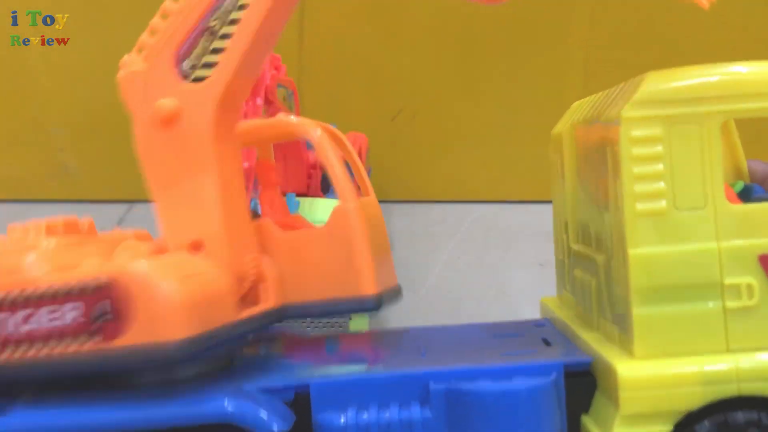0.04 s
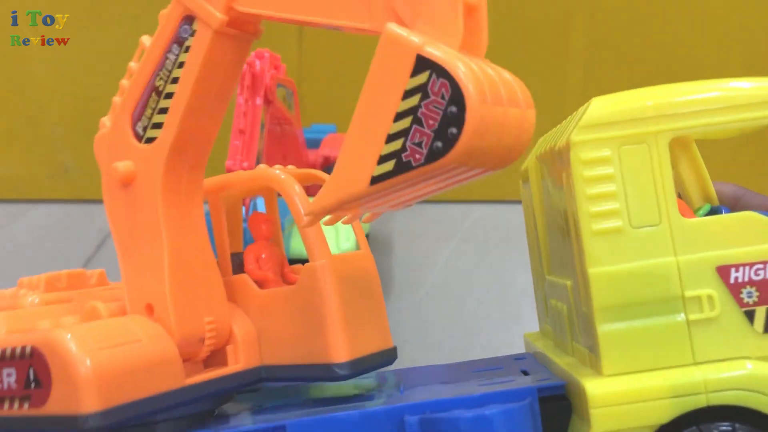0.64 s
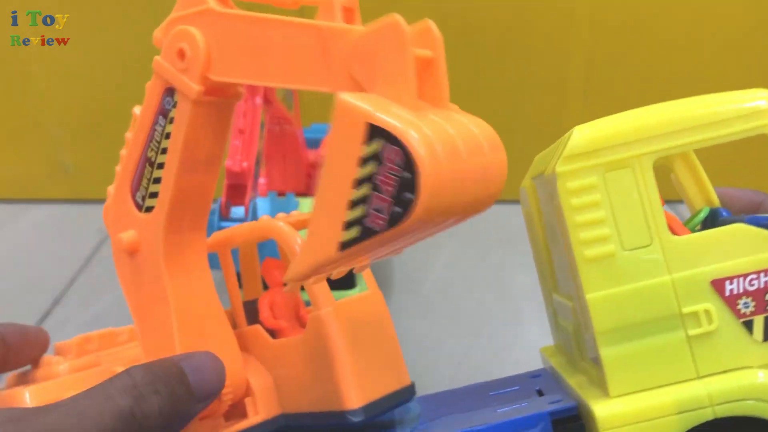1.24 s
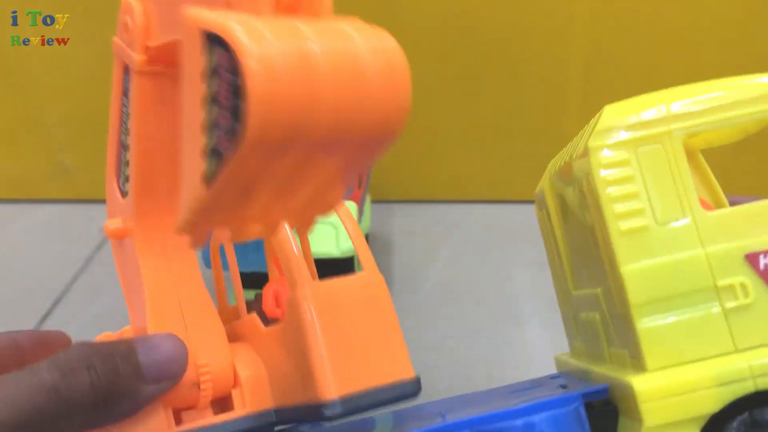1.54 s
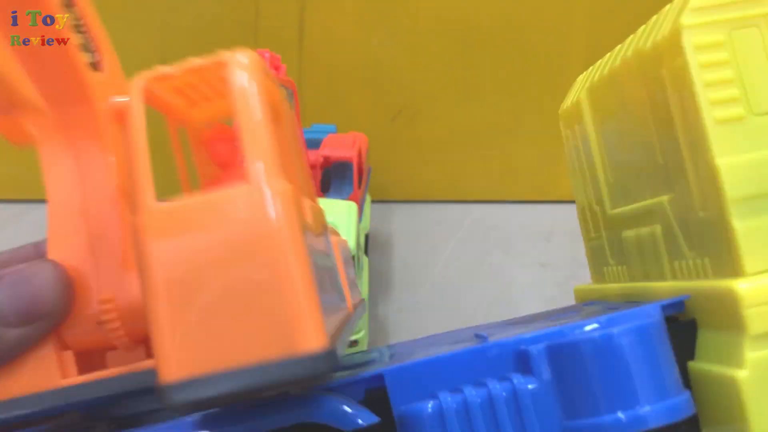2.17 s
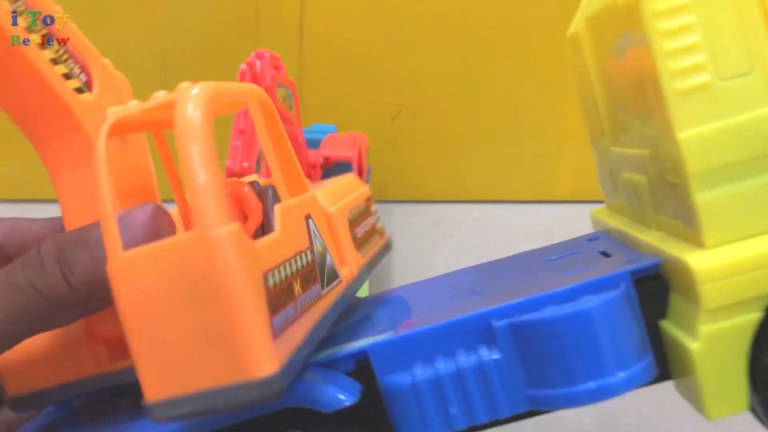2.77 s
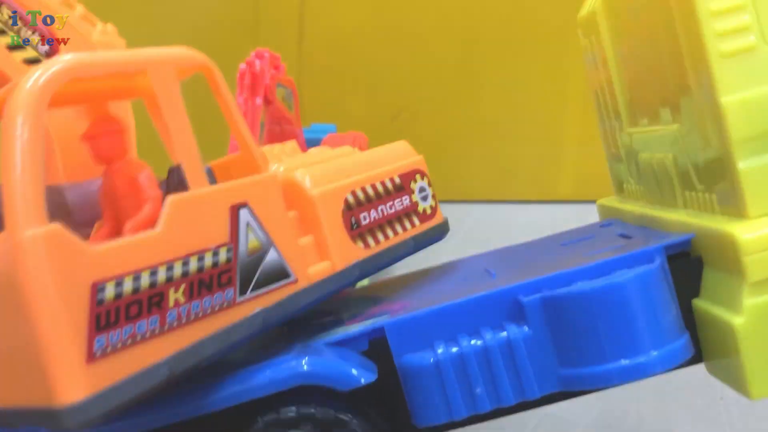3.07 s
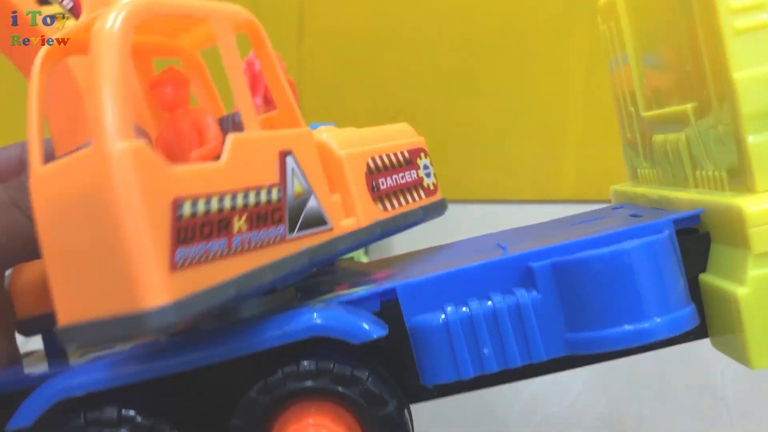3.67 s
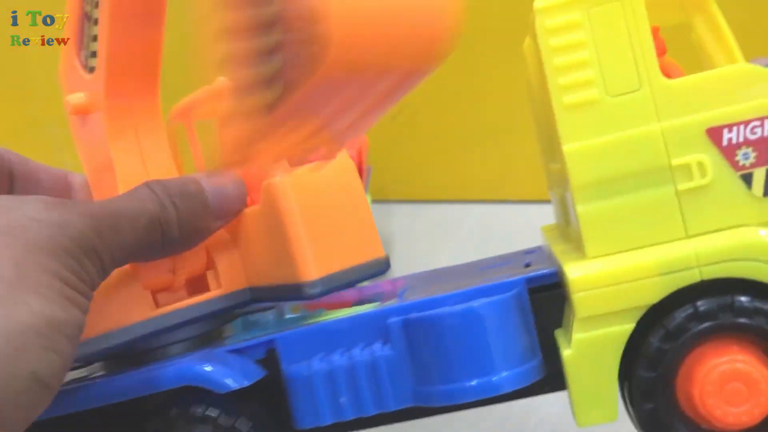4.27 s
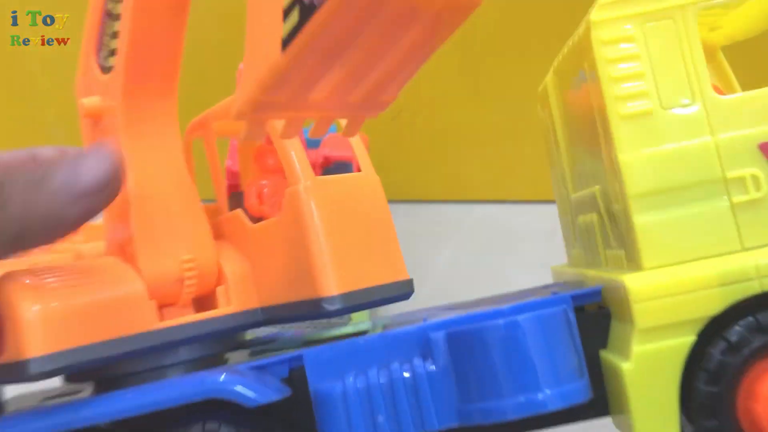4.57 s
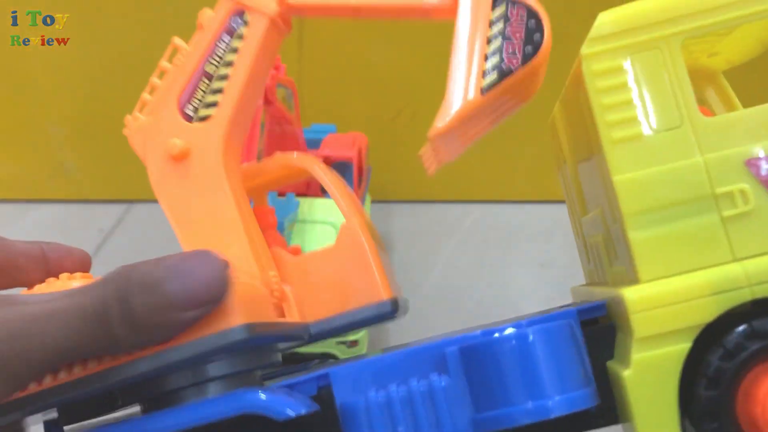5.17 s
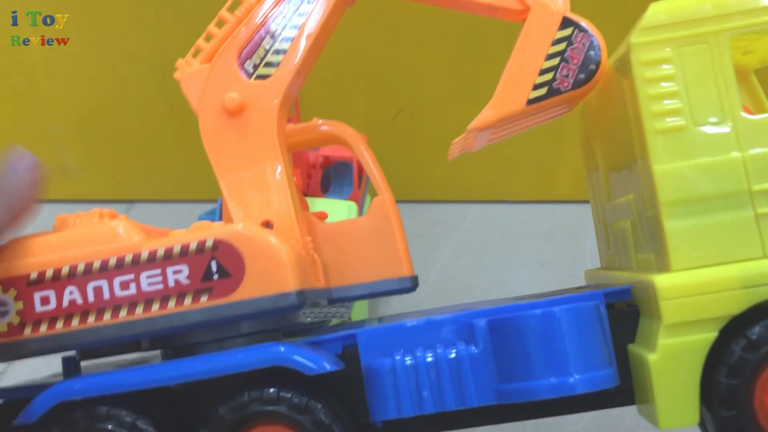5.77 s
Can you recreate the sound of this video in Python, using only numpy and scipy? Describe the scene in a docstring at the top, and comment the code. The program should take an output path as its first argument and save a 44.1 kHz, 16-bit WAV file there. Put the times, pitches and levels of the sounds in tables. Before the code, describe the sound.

A hollow plastic toy's stiff joint clicks and snaps in short ratcheting bursts, with light bumps and ticks over faint room hum.

```python
"""Over faint room hum, a stiff plastic joint clicks and snaps: a hollow toy excavator is being turned by
hand on a toy truck's trailer, close to a phone in a hard room. Each ratchet step slips in a run of
clicks, then catches with a snap that rings the shell. The base bumps softly on the trailer, and loose
parts tick under the fingers. The room answers each burst; the phone's limiter flattens the loudest snaps.
"""
import sys
import numpy as np
from scipy import signal
from scipy.fft import rfft, irfft
from scipy.io import wavfile
from scipy.ndimage import uniform_filter1d, minimum_filter1d

SR = 44100
rng = np.random.default_rng(int(sys.argv[2]) if len(sys.argv) > 2 else 0)


def dump(signal):
    """Clip the signal to [-1, 1] and save it as 16-bit WAV at the path in sys.argv[1]."""
    limited = np.clip(np.atleast_2d(signal).T, -1, 1)
    pcm = np.round(limited * 32767).astype(np.int16)
    wavfile.write(sys.argv[1], SR, pcm)


N = 265041

# spectrum of the room's air and rumble: f/Hz, relative level/dB
AIR_SPECTRUM = [(15, -48), (25, -46), (48, -9.5), (70, -1), (92, 1.5), (236, -15.5), (293, -10), (384, -21),
                (641, -16), (911, -22.5), (1370, -23), (1840, -24.5), (2910, -30), (4030, -31.5),
                (10400, -38), (16000, -41.5)]
# swells of the low hum: t/s, level/dB
HUM_SWELLS = [(0, -56), (1.7, -54.5), (1.949, -41), (2.25, -51), (4.2, -54), (4.498, -43.5), (5.3, -42),
              (5.55, -52.5), (6, -46.5)]
# Bass and treble below are set against the mids.
# click runs of a slipping joint: t/s, length/s, clicks, first level/dB, swell over the run/dB,
# first treble/dB, last treble/dB, joint ring f/Hz
SLIP_RUNS = [(0.0824, 0.0032, 2, -5, -10, 3, 10.5, 4400), (0.3418, 0.0021, 2, -24, -1.5, -16, -1, 4420),
             (1.434, 0.0089, 5, -20.5, 2, 2.5, 9.5, 4500), (1.6899, 0.0063, 3, -21.5, 4.5, -15, 8, 4700),
             (1.9171, 0.0047, 2, -15.5, 7, 3.5, 3.5, 4730), (2.1329, 0.0044, 3, -15.5, 2.5, -3, 3.5, 3630),
             (2.8622, 0.012, 7, -4.5, -10.5, 2, 6, 2215), (3.0394, 0.014, 8, -6.5, -11, 0.5, 6, 2100),
             (3.9288, .003, 2, 6, -10.5, 4.5, 3, 2130), (4.0379, 0.0035, 2, 7.5, -11.5, 2, 5, 2540),
             (4.1235, .0041, 2, 5, -5.5, 0.5, 3, 2460), (4.1764, 0.0055, 2, -2, -17, -20, 24, 1260),
             (4.2798, 0.0044, 2, -1, -17, -5, 4, 1750), (4.9833, 0.0027, 2, 3, -21, -9, 18, 4480),
             (5.0868, 0.0075, 2, 1, -24, -4.5, 15, 2230), (5.2262, 0.0062, 2, 5.5, -19.5, -2, 1, 4040)]
# the ratchet catching its next tooth: t/s, level/dB, bass/dB, treble/dB, joint ring f/Hz
TOOTH_CATCHES = [(0.0972, 1, 11, 6, 3900), (0.3771, -1.5, 10, -6.5, 4250), (1.4698, -2.5, 9, -3.5, 4250),
                 (1.7227, -2.5, 10, 6, 4060), (1.9413, -3.5, 14.5, 10.5, 4880),
                 (2.1531, -0.5, 14, -0.5, 1210), (2.875, -8, 22.5, 8, 4300),
                 (3.0552, -1.5, 16.5, 4.5, 2100), (3.9351, -2, 19.5, 11, 8500),
                 (4.044, -2.5, 14, 13.5, 8400), (4.1314, 2.5, 12, 9, 8170), (4.1848, -2, 10.5, 2, 2570),
                 (4.2904, -6.5, -10, 16, 8200), (4.2933, 2, 6.5, -4.5, 7600), (4.9926, -7.5, 21, 6, 4270),
                 (5.0997, -2, 15.5, 11.5, 4400), (5.2368, -8, 22, 19, 8100)]
# modes of the excavator's shell: f/Hz, level/dB, t60/s
SHELL_MODES = [(340, -35, 0.011), (613, -27.5, 0.024), (930, -67, 0.0072), (1177, -4.5, 0.024),
               (1419, 0, 0.015), (1694, -2.5, 0.014), (2247, -14, 0.018), (2710, -11, 0.014),
               (3206, -13.5, 0.021), (3810, -29, 0.024), (3930, -14.5, 0.012), (4500, -9.5, 0.0058),
               (5500, -24, 0.0076), (6900, -20, 0.016), (7690, -12, 0.011), (8640, -12, 0.011),
               (10230, -14, 0.0059)]
# crack of a hit, from dense, quickly damped modes of the plastic: f/Hz, relative level/dB
CRACK_SPECTRUM = [(200, -17), (700, -32), (1500, -23), (4400, 17.5), (6000, -0.5), (8200, 9.5), (11000, 5),
                  (15500, -4)]
# colour of the reverb: f/Hz, relative level/dB
REVERB_SPECTRUM = [(150, -8.5), (240, -8), (300, 2.5), (370, -4.5), (620, 4), (850, 8.5), (1230, 14.5),
                   (1550, 9), (2000, 4), (3000, 2.5), (4200, 1), (5800, -6.5), (8200, -2), (11500, -11),
                   (16000, -22)]
# decay of the reverb: f/Hz, t60/s
REVERB_DECAY = [(280, 0.23), (450, 0.3), (900, 0.32), (1200, 0.39), (2400, .37), (4200, 0.42), (6000, 0.41),
                (8400, 0.38), (15000, 0.36)]
# light bumps of toy on toy: t/s, level/dB, bass/dB, treble/dB, touched part's ring f/Hz
TOY_BUMPS = [(0.1998, -23, 8, 1, 1460), (0.3425, -29.5, 22, -8, 690), (0.6653, -41, 10, -11, 1060),
             (0.8445, -35, 9, -12, 2900), (1.0723, -43, -5, -8, 3520), (2.399, -41, 15, 6, 5170),
             (2.6407, -34.5, 23.5, -5, 640), (2.9243, -13.5, -22, -21, 1120), (3.0001, -24, 7, -33, 1140),
             (3.1051, -14, -23, -9, 1270), (3.5558, -36, -2, -1, 1360), (3.8228, -30.5, 18, -12, 2820),
             (3.8669, -37, 12, 1, 3540), (4.7484, -38, 11, -19, 950), (4.8929, -39.5, 33, 0, 650),
             (5.0362, -13, 7, -10, 1170), (5.2667, -13.5, 7.5, -6, 650), (5.4649, -36.5, 21.5, -2, 3580),
             (5.5771, -25, 12, -8.5, 720), (5.7546, -13, 6.5, -5.5, 1420), (5.855, -34, 15.5, -31, 660),
             (5.9624, -35, 14, -5, 1100)]
# modes of the trailer deck: f/Hz, level/dB, t60/s
DECK_MODES = [(626, -14, 0.035), (717, -13.5, 0.064), (1175, -5, 0.0047), (1340, 0.5, 0.0062),
              (1653, -12, 0.025), (2520, -17, 0.016), (3300, -8.5, 0.011), (4500, -15.5, 0.011)]
# spells of fingering the loose parts: start t/s, end t/s, level/dB
FINGER_SPELLS = [(0.402, 1.402, -59.5), (2.249, 2.849, -45), (3.298, 3.922, -51.5), (4.448, 4.981, -49),
                 (5.402, 6.0, -47)]


def undb(db):
    """Decibels to gain."""
    return 10 ** (np.asarray(db) / 20)


def on_log_axis(hz, points):
    """Read a curve of (f/Hz, value) points, joined by straight lines on a log-frequency axis."""
    f, value = np.transpose(points)
    return np.interp(np.log(np.maximum(hz, 1)), np.log(f), value)


def noise(spectrum, size):
    """Noise of rms 1, shaped to the given spectrum."""
    eq = undb(on_log_axis(np.fft.rfftfreq(size, 1 / SR), spectrum))
    shaped = irfft(rfft(rng.standard_normal(size)) * eq, size)
    return shaped / shaped.std()


def fade(t, t60):
    """Exponential decay, 60 dB down at t60."""
    return np.exp(-np.log(1000) * t / t60)


def drift(rate_hz):
    """Smooth random wobble with a spread near 1."""
    knots = rng.standard_normal(256)
    return uniform_filter1d(np.interp(np.arange(N) / SR * rate_hz, np.arange(256), knots), 1024)


def room_tone():
    """A bed of steady air, with a wavering low hum that swells and fades."""
    air = undb(-48.5) * noise(AIR_SPECTRUM, size=N)
    hum_hz = 86 * (1 + 0.029 * drift(rate_hz=15))
    hum_db = np.interp(np.arange(N) / SR, *np.transpose(HUM_SWELLS)) + drift(rate_hz=15)
    return air + undb(hum_db) * np.sin(2 * np.pi * np.cumsum(hum_hz) / SR)


def slip_clicks(jitter_s=0.00022, scatter_db=3.5, first_bass_db=-2, last_bass_db=6):
    """Stick and slip: rows of nearly even hits whose level and brightness glide across each run."""
    clicks = []
    for start, length, count, first_db, swell_db, first_treble_db, last_treble_db, joint_hz in SLIP_RUNS:
        for along in np.linspace(0, 1, int(round(count))):
            late, loud = rng.standard_normal(2)
            onset = start + along * (length + jitter_s * late)
            level_db = first_db + along * swell_db + scatter_db * loud
            # a run gains bass as the shell gives way
            bass_db = first_bass_db + along * (last_bass_db - first_bass_db)
            treble_db = first_treble_db + along * (last_treble_db - first_treble_db)
            clicks.append((onset, level_db, bass_db, treble_db, joint_hz))
    return clicks


def hit_eq(hz, bass_db, treble_db):
    """Low and high shelves in dB that make a hit dull or sharp."""
    return on_log_axis(hz, [(620, bass_db), (1050, 0), (2600, 0), (7000, treble_db)])


def plastic_hits(hits, modes, crack_db, crack_t60, part_db, part_t60, low_cut_hz):
    """Each hit rings the touched part and the whole plastic body, with a short crack on top."""
    size = 4096
    out, t = np.zeros(N + size), np.arange(size) / SR
    hz, mode_db, t60 = np.transpose(modes)[:, :, None]
    for start, level_db, bass_db, treble_db, part_hz in hits:
        # the place of contact shifts the mix of the modes a little
        loud, detune, lag = rng.standard_normal((3, len(modes), 1))
        strength = undb(mode_db + hit_eq(hz, bass_db, treble_db) + 1.5 * loud)
        pitch_hz = hz * (1 + 0.03 * detune)
        # low bending waves travel slowly, so each knock sweeps downwards
        delay_s = 0.00056 * (1000 / hz) ** 2 + 0.0001746 * np.abs(lag)
        age = np.maximum(t - delay_s, 0)
        body = strength * fade(age, t60) * np.sin(2 * np.pi * pitch_hz * age)
        part = undb(part_db) * fade(t, part_t60) * np.sin(2 * np.pi * part_hz * t)
        crack = undb(crack_db + treble_db) * fade(t, crack_t60) * noise(CRACK_SPECTRUM, size)
        i = int(start * SR)
        out[i:i + size] += undb(level_db) * (body.sum(axis=0) + part + crack)
    # a small open shell radiates almost no bass
    return signal.sosfilt(signal.butter(3, low_cut_hz, "high", fs=SR, output="sos"), out[:N])


def reverb_send(hits, eq_depth):
    """Summed over all directions the resonances blur: a hit reaches the walls as a broad-toned pulse."""
    out, hz = np.zeros(N + 256), np.fft.rfftfreq(256, 1 / SR)
    for start, level_db, bass_db, treble_db, _ in hits:
        spectrum = undb(level_db + eq_depth * hit_eq(hz, bass_db, treble_db))
        i = int(start * SR)
        out[i:i + 256] += np.fft.fftshift(irfft(spectrum))
    return out[:N]


def room_reverb(send, wet_db, early_db, wall_delay_s):
    """Early reflections off floor and toys, then a dense tail from the walls."""
    size = 32768
    t, hz = np.arange(size) / SR, np.fft.rfftfreq(size, 1 / SR)
    spectrum = rfft(noise(REVERB_SPECTRUM, size))
    tail = np.zeros(size)
    for k, (_, t60) in enumerate(REVERB_DECAY):
        band = on_log_axis(hz, [(f, j == k) for j, (f, _) in enumerate(REVERB_DECAY)])
        tail += irfft(spectrum * band) * fade(t, t60)
    # the first wall reflections stand out above the diffuse wash that follows
    wall_slap = 1 + undb(3.0) * fade(np.maximum(t - wall_delay_s, 0), t60=0.064)
    tail *= np.where(t < wall_delay_s, undb(early_db), wall_slap)
    return undb(wet_db) * signal.fftconvolve(send, tail / np.linalg.norm(tail))[:N]


def finger_ticks(per_spell, spread_db=13, dull_bass_db=14, dull_treble_db=-5):
    """Loose parts tick at random under the fingers: rows of tiny hits, laid out like the bumps."""
    ticks = []
    for start, end, spell_db in FINGER_SPELLS:
        when, force, dullness, part = rng.random((per_spell, 4)).T
        onsets = start + (end - start) * (np.arange(per_spell) + when) / per_spell
        level_db = spell_db + spread_db * (force - 0.5)
        part_hz = 600 * 5 ** part
        ticks.extend(zip(onsets, level_db, dull_bass_db * dullness, dull_treble_db * dullness, part_hz))
    return ticks


def scene():
    """Close ratchet snaps, bumps and ticks, mixed with their reverb over the room tone."""
    ratchet = np.vstack([slip_clicks(), TOOTH_CATCHES])
    touches = np.vstack([TOY_BUMPS, finger_ticks(per_spell=20)])
    snaps = plastic_hits(ratchet, SHELL_MODES, crack_db=-3.5, crack_t60=0.009,
                         part_db=-2.5, part_t60=0.012, low_cut_hz=478)
    bumps = plastic_hits(touches, DECK_MODES, crack_db=-13.0, crack_t60=0.014,
                         part_db=-2.5, part_t60=0.018, low_cut_hz=765)
    # the strongest resonances carry in every direction, so a little ring reaches the walls too
    snap_send = reverb_send(ratchet, eq_depth=0.88) + undb(-38.5) * snaps
    bump_send = reverb_send(touches, eq_depth=1.0) + undb(-24.0) * bumps
    snap_reverb = room_reverb(snap_send, wet_db=3.5, early_db=-0.5, wall_delay_s=0.013)
    bump_reverb = room_reverb(bump_send, wet_db=4.5, early_db=11, wall_delay_s=0.0095)
    return (snaps + bumps + snap_reverb + bump_reverb + room_tone())[None]


def limiter(x, ceiling_db, release_s):
    """The gain ducks just ahead of any burst over the ceiling and recovers within milliseconds."""
    envelope = np.sqrt(np.maximum(uniform_filter1d(x ** 2, size=21), 0))
    overshoot = np.maximum(envelope / undb(ceiling_db), 1)
    release = np.arange(N) / SR / release_s
    reduction = np.maximum.accumulate(np.log(overshoot) + release, axis=-1) - release
    lookahead_gain = minimum_filter1d(np.exp(-reduction), size=25)
    return x * uniform_filter1d(lookahead_gain, size=25)


def record(dry):
    """The phone limits the level, soft-clips the spikes that slip through and cuts the top."""
    clip_level, high_cut_hz = 0.65, 16000
    limited = limiter(dry, ceiling_db=-10.0, release_s=0.011)
    rounded = limited / (1 + (limited / clip_level) ** 4) ** 0.25
    return signal.sosfilt(signal.ellip(8, 0.2, 70, high_cut_hz, fs=SR, output="sos"), rounded)


dry = scene()
out = record(dry)
dump(out)
```